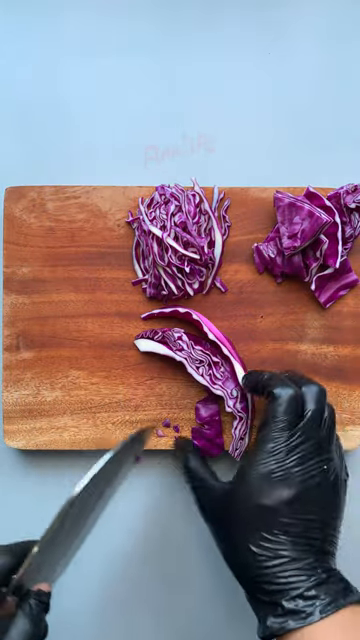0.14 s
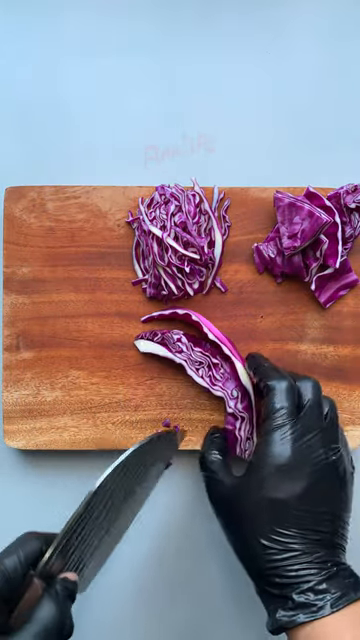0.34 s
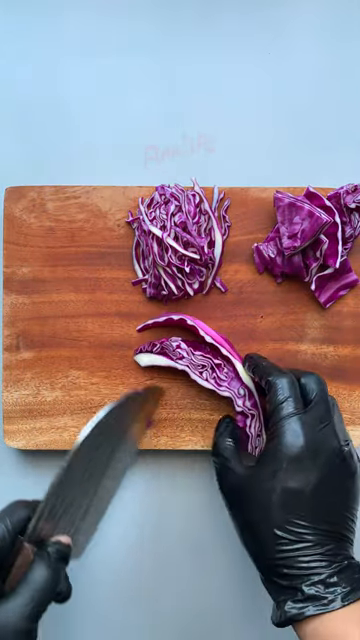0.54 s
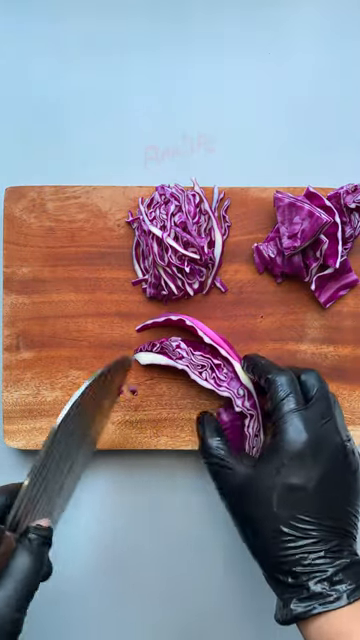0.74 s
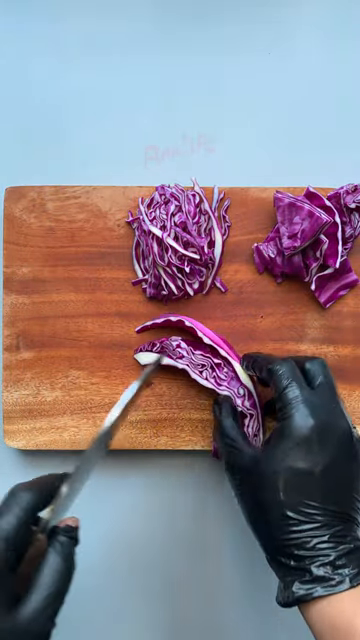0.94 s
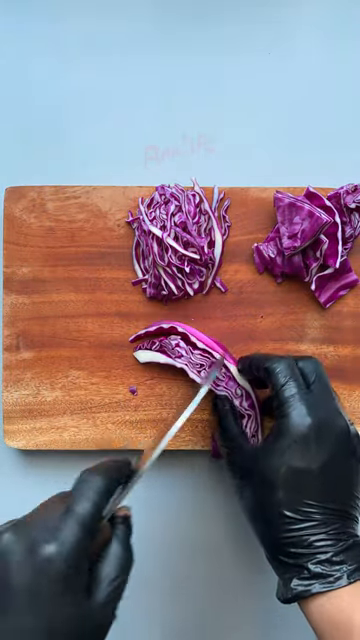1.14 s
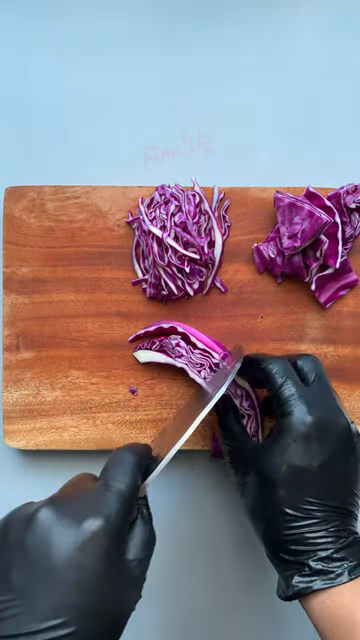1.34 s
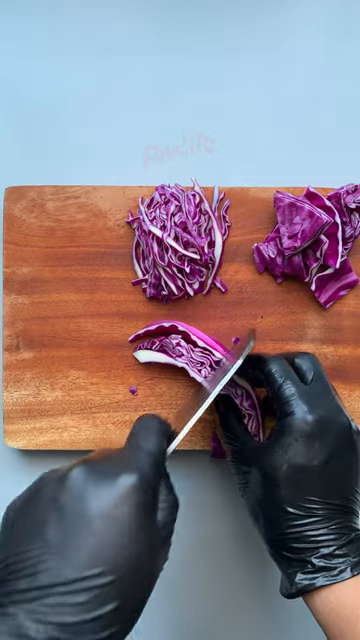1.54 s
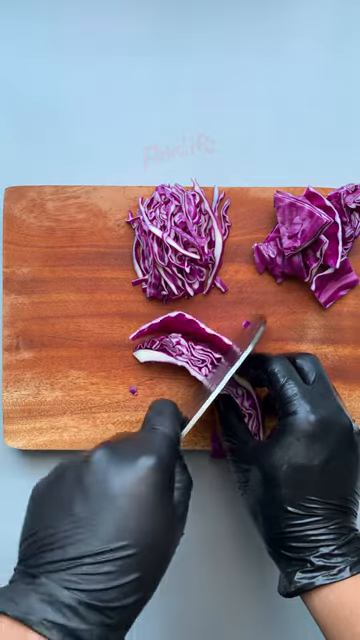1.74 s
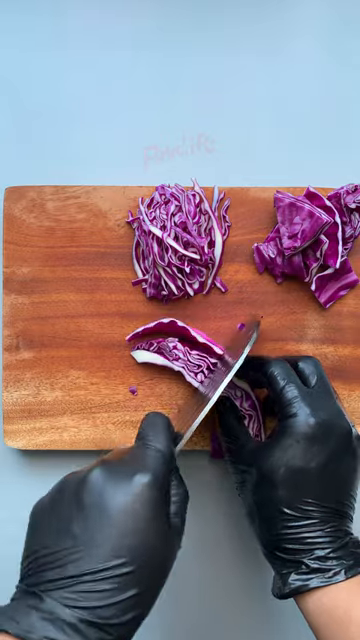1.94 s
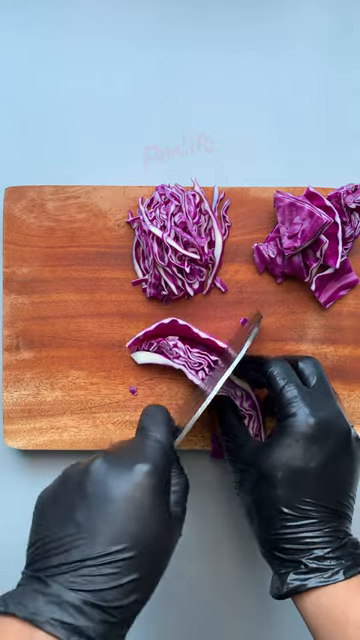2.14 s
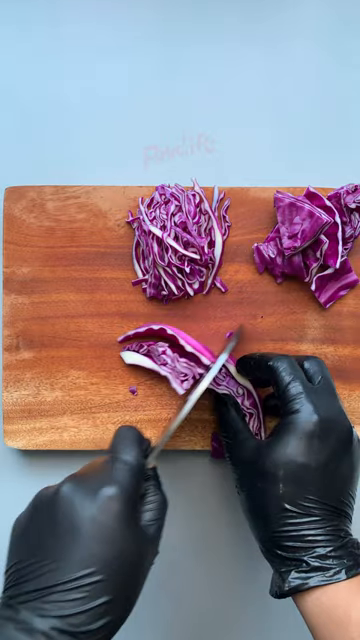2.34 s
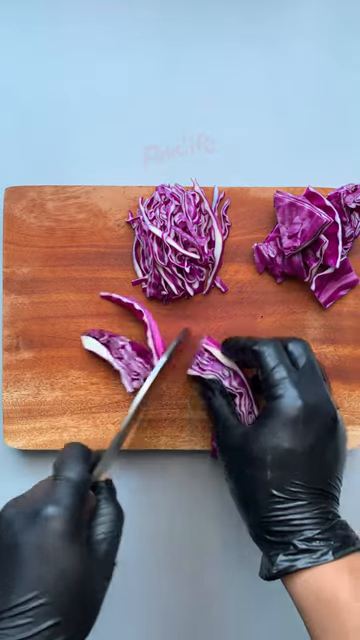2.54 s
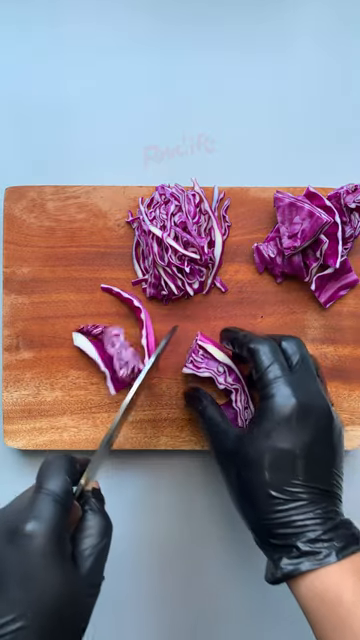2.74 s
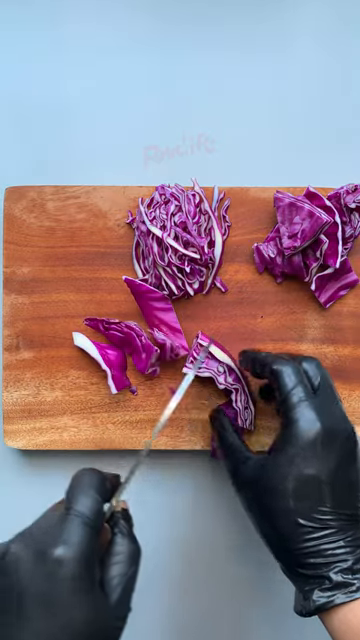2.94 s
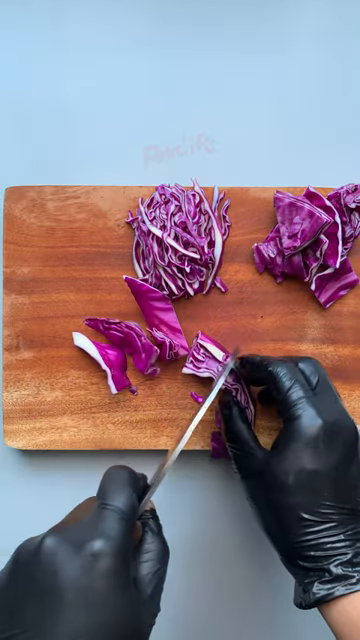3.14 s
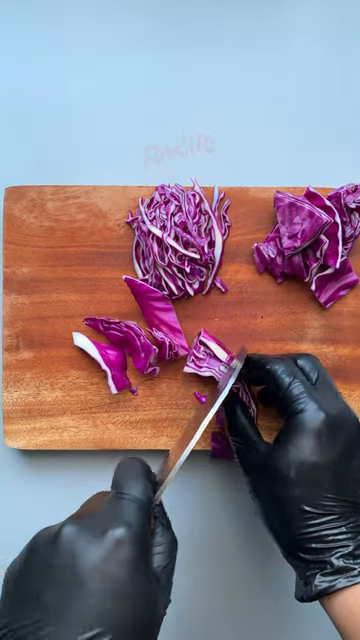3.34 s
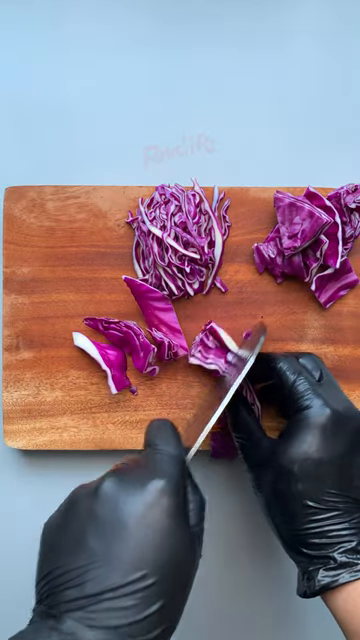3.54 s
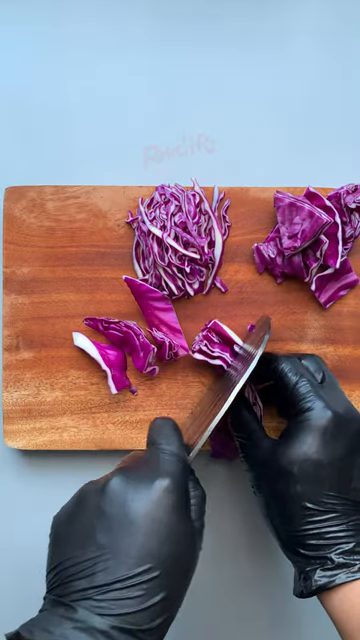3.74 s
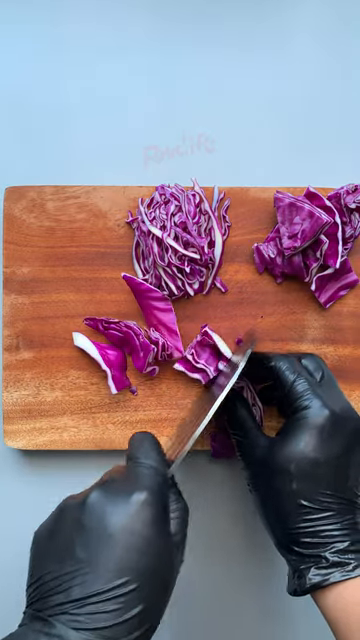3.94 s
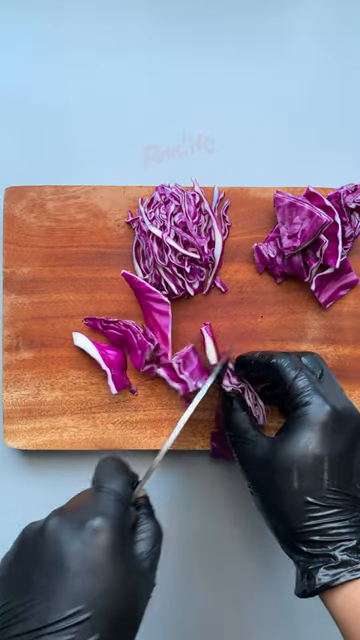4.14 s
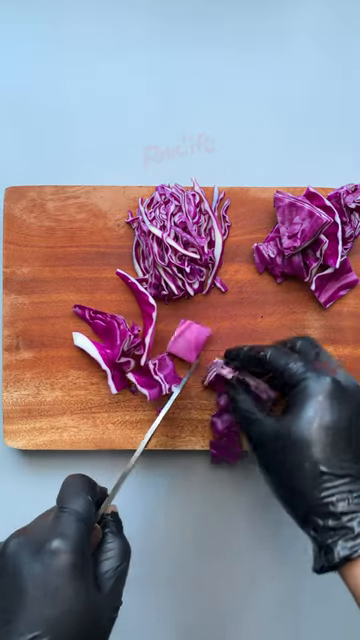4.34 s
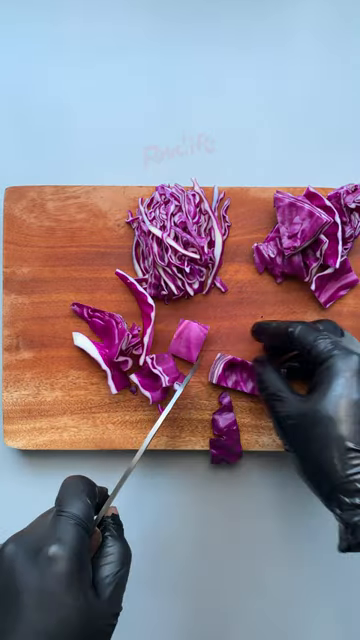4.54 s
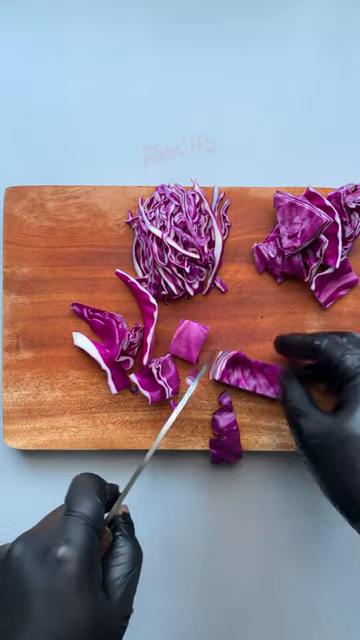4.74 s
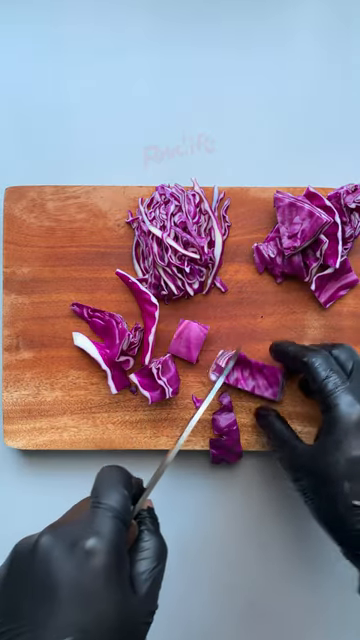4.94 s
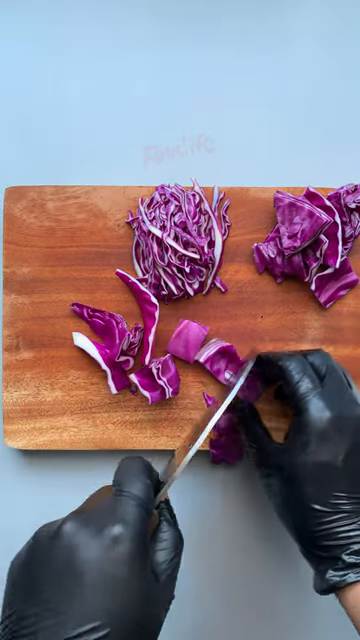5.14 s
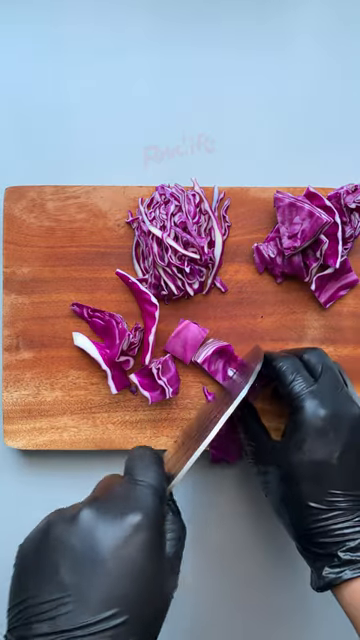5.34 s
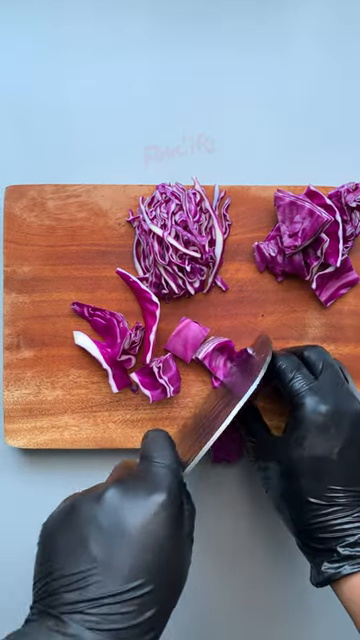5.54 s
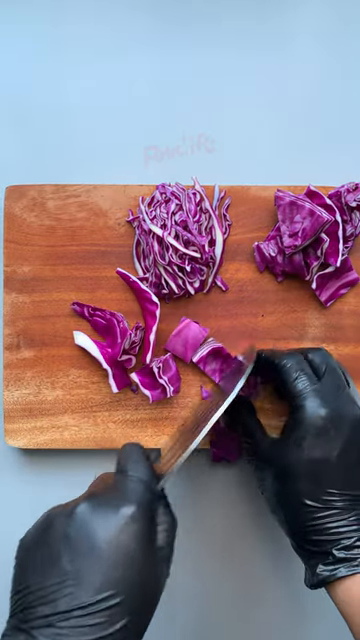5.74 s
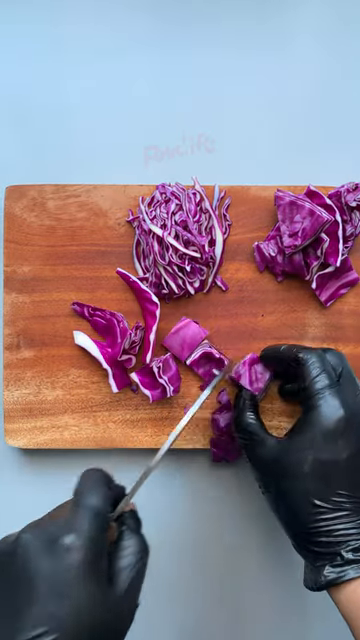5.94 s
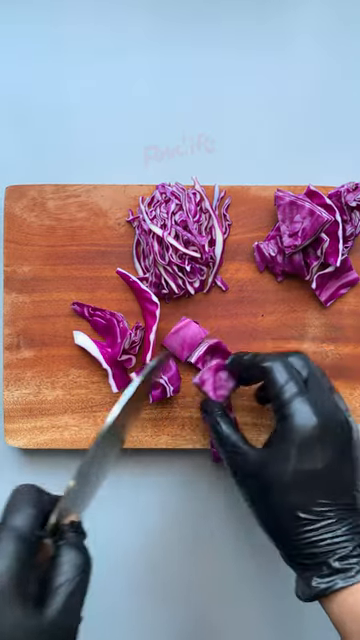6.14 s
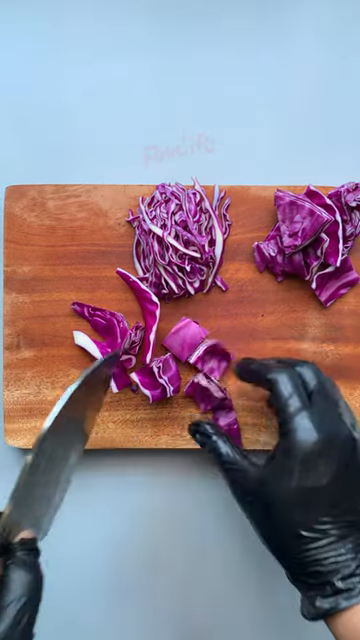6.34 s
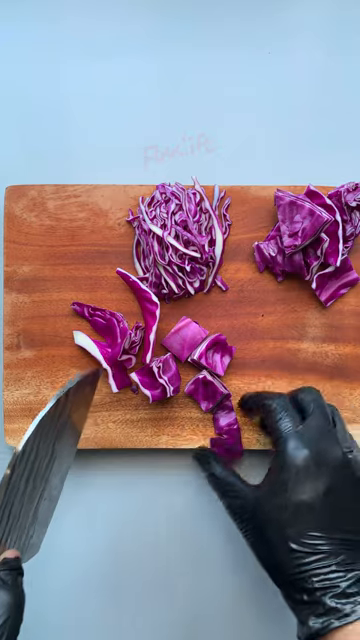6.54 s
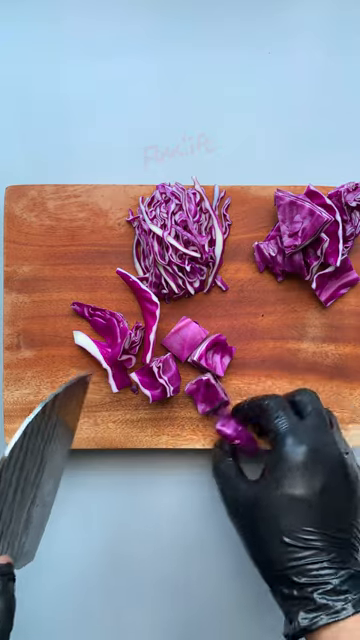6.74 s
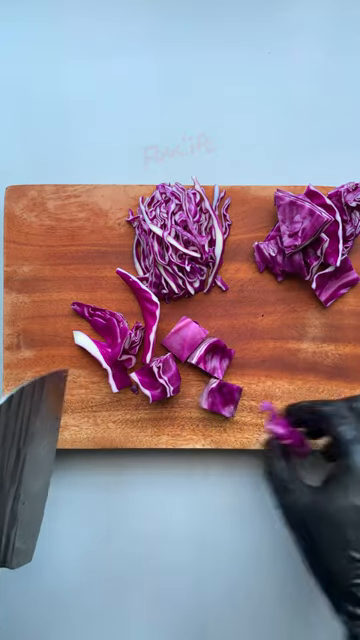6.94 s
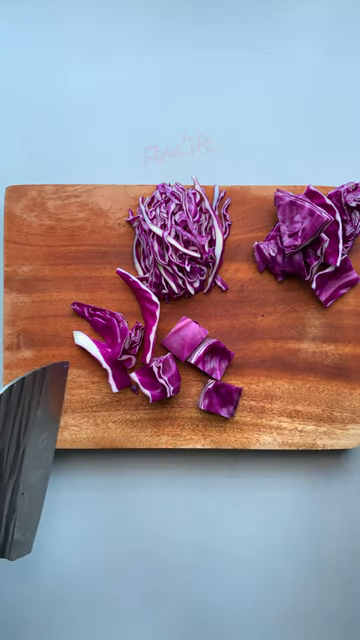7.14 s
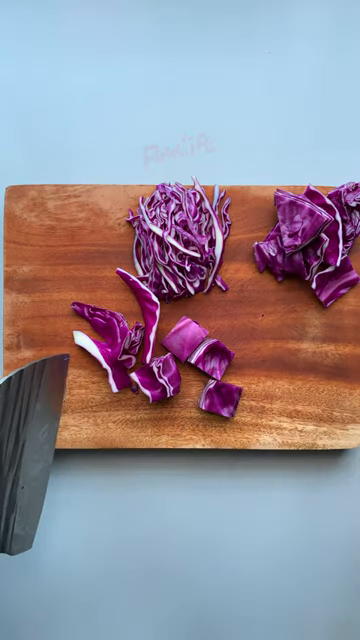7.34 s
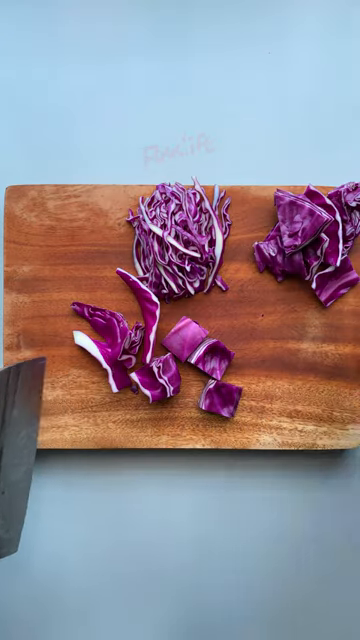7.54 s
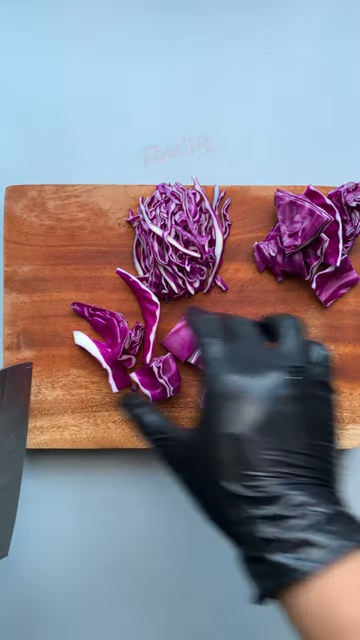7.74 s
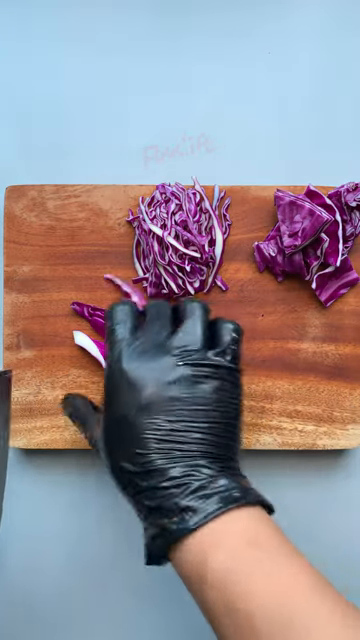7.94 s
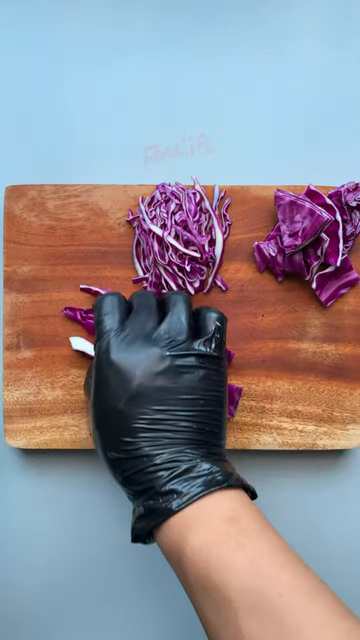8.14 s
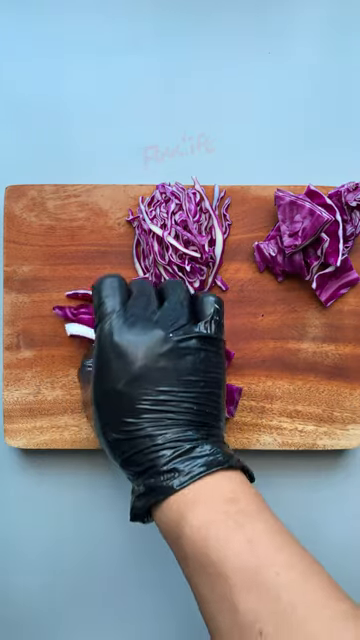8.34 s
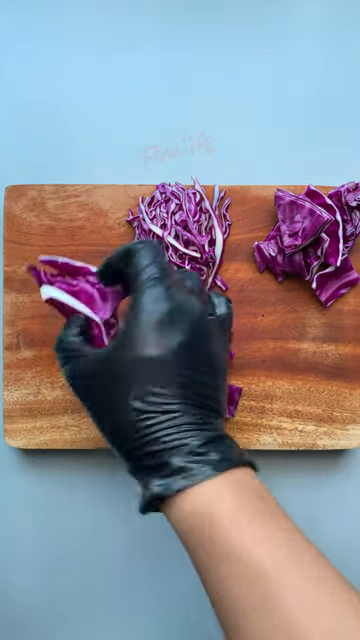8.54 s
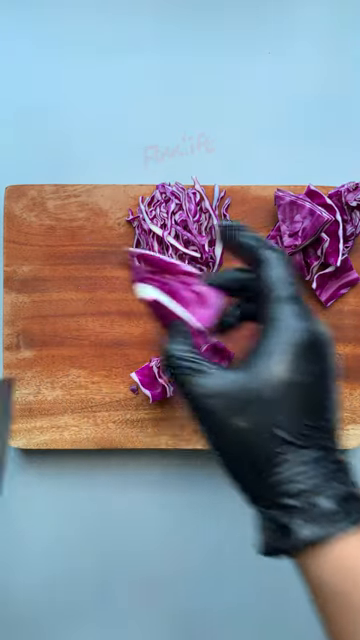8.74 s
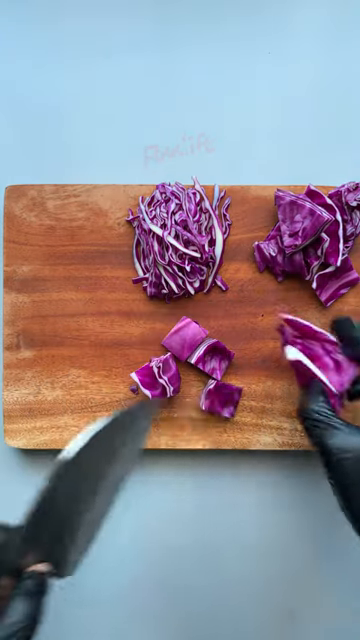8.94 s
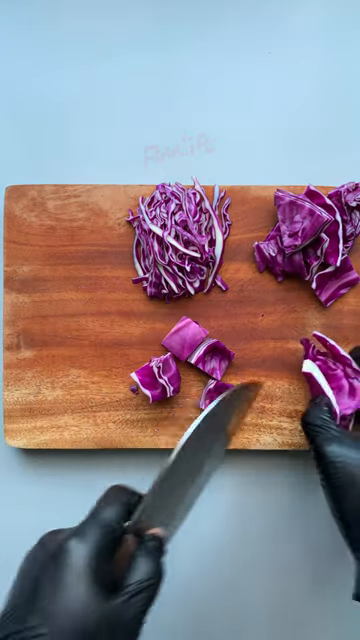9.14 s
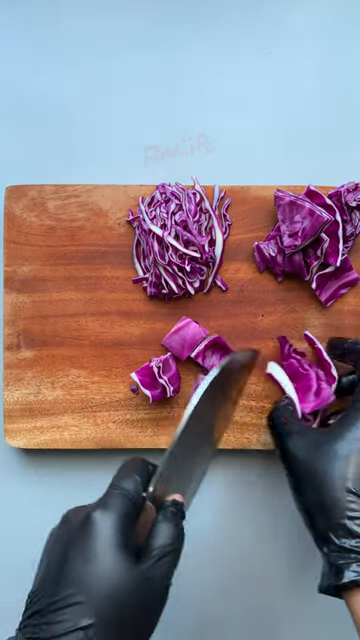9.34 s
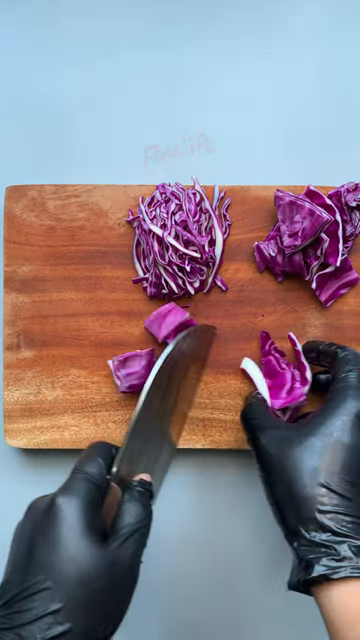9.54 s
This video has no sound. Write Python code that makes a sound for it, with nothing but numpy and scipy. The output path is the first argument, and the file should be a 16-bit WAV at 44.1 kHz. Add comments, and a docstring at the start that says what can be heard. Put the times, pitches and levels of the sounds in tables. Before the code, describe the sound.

A knife knocks on a wooden cutting board with a light steel ring, then pushes through crisp cabbage in three slow, crackling cuts. Each ends in a wooden knock, the second by far the loudest and the third followed by another. A gloved hand then softly rustles the pieces, and the blade taps and scrapes lightly. The sounds are close to the microphone in a quiet kitchen.

```python
"""A chef's knife cuts red cabbage on a wooden board, close to a phone in a quiet kitchen.
Leaf cells burst in a dense crackle, ribs snap and the waxy skin squeaks. The blade knocks on the
board and rings as it taps and drags over the wood; then a gloved hand gathers the pieces.
The phone's limiter turns down the hardest knock and lets the sound of the room swell back."""
import sys
import numpy as np
from scipy import signal
from scipy.fft import rfft, irfft, next_fast_len
from scipy.io import wavfile
from scipy.ndimage import uniform_filter1d, minimum_filter1d, map_coordinates

SR = 44100
rng = np.random.default_rng(int(sys.argv[2]) if len(sys.argv) > 2 else 0)


def waveform_to_disk(signal):
    """Save audio, clipped to [-1, 1], as 16-bit WAV at the path in sys.argv[1]."""
    frames = np.transpose(np.atleast_2d(signal))
    scaled = np.clip(frames, -1, 1) * 32767
    samples = np.round(scaled).astype(np.int16)
    wavfile.write(sys.argv[1], SR, samples)


N = 426888
TIME = np.arange(N) / SR
SIZE = next_fast_len(N + SR, real=True)
FREQ = np.maximum(np.arange(SIZE // 2 + 1) * SR / SIZE, 1)

# tone of the quiet room: (frequency [Hz], level [dB])
HUSH_TONE = [(15, -43.5), (25, -19.5), (92, 2.5), (166, -11.5), (200, -5.5), (223, -14.5), (451, -13),
             (575, -22.5), (624, -20), (911, -24.5), (4200, -33), (5400, -45), (8360, -50), (9840, -59.5),
             (12500, -54), (16000, -72.5)]
# slow rise and fall of its hiss: (time [s], gain [dB])
HISS_CHANGES = [(0, -0.5), (1.1, -7.5), (2.8, -0.5), (4.2, 3), (4.7, 2.5), (7.1, 3), (7.7, 2), (8.3, -3),
                (9.68, -6)]
# moves of the glove among the leaves: (time [s], level [dB], length [s])
GLOVE_MOVES = [(0.0, -62.5, 0.08), (0.294, -65, .2), (0.954, -76.5, 0.25), (2.8, -67, 0.19),
               (3.243, -70.5, 0.095), (4.309, -72.5, 0.39), (4.632, -72, .3), (4.899, -78, 0.28),
               (5.314, -76.5, .2), (5.961, -61.5, 0.14), (6.036, -63.5, 0.15), (6.123, -59.5, 0.093),
               (6.346, -72, .2), (7.389, -60.5, 0.27), (7.681, -52.5, 0.23), (7.77, -55, 0.093),
               (7.94, -57, 0.14), (8.23, -64, 0.17), (8.66, -55.5, 0.13), (8.759, -52, 0.094),
               (8.891, -61.5, 0.3), (9.388, -67.5, .3)]
# tone of the glove's crinkle: (frequency [Hz], level [dB])
GLOVE_TONE = [(1000, -26.5), (2500, -20.5), (4700, -8.5), (6400, -0.5), (8200, 1.5), (10000, -4),
              (12100, -5), (16000, -11)]
# notes at which fibres and folds snap: (pitch [Hz])
FIBRE_PITCHES = [1500, 2600, 4100, 6400, 8200, 11500, 13200]
# blows on the board: (time [s], level [dB], dull above [Hz], pitch favoured by the spot hit [Hz],
# thump of the table [dB], gain into the room [dB])
BOARD_KNOCKS = [(0.388, -17.5, 624, 740, -11, 3), (0.399, -21.5, 149, 126, 5, -6.5),
                (1.382, -38.5, 405, 192, 23.5, 8.5), (2.086, -23, 374, 273, -3, 4),
                (2.443, -38, 147, 120, 28, 4), (3.326, -27, 540, 377, 15.5, 3),
                (3.345, -33, 259.9, 190.3, 10, 0), (3.8003, -14, 1250, 704, -5.5, 0.5),
                (3.804, 6, 1560, 618, -6, 1.5), (4.152, -42, 168, 120, 37, 0),
                (4.178, -42, 1202, 862, -4, -2), (5.41, -30.5, 470, 392, 19, 6),
                (5.513, -6.5, 575, 518, 4.5, 0), (5.614, -26.5, 248, 197, -8, -3.5),
                (5.7942, -12, 1080, 1090, 2, -3), (9.073, -49, 400, 299, -4, 6.5),
                (9.485, -46, 1390, 1080, 33.5, 10.5)]
# notes at which the board rings: (pitch [Hz], width [Hz], level [dB])
BOARD_NOTES = [(131, 40, -10.5), (185, 59, -16.5), (256.3, 37, -3), (361.7, 70, -7), (467, 88, 2),
               (593, 60, -8), (675, 56, -4), (798, 21, -10), (828.4, 45, -6.5), (1085, 72, -1),
               (1196, 23, -14), (1347, 52, -8), (1410, 29, -4), (1513, 38, -10.5), (1629.5, 90, -19),
               (1870, 75, -4), (2200, 110, -16), (2750, 260, -12.5), (3600, 600, -9.5)]
# the edge meets bare wood, stuttering at the end: (time [s], level [dB], longest ring time [s])
BLADE_TAPS = [(0.388, -37, 0.73), (2.443, -35.5, 0.43), (2.525, -35, 0.45), (4.177, -50, .2),
              (9.486, -35, 0.048), (9.519, -35, 0.062), (9.542, -41, .05), (9.562, -44, .05),
              (9.582, -45, .05)]
# notes of the steel; a ring time (t60) is a fade of 60 dB: (pitch [Hz], ring time [s], level [dB])
BLADE_NOTES = [(1108, 0.13, 7.5), (1940, 0.77, 6), (2800, 0.063, 1), (3000, 0.16, 0.5), (3180, 0.18, -9),
               (3460, 0.096, -4), (5240, 0.28, -6.5), (5690, 0.12, -1.5), (6330, .2, -4.5),
               (6486, 0.13, -2), (6600, 0.25, -5.5), (6920, 0.16, 1), (8600, 0.1, 3.5),
               (10763, 0.069, -0.5), (12400, 0.1, -3), (13350, 0.13, -6.5)]
# drags over the wood: (time at full force [s], rise [s], hold [s], fall [s], level [dB],
# gain of the board's rumble [dB], gain of the steel's ring [dB])
BLADE_DRAGS = [(0.524, 0.15, 0.028, 0.1, -67, -21, 16), (2.398, 0.52, .06, 0.047, -54, -9.5, -1.5),
               (2.477, 0.065, 0.062, 0.11, -48, 2, -4.5), (4.022, 0.12, 0.15, .1, -60, 6.5, 0),
               (9.533, 0.12, 0.038, 0.18, -55.5, -3, -10)]
# tone of the edge catching on the grain: (frequency [Hz], level [dB])
GRIT_TONE = [(500, -12), (1100, -1), (1600, 0.5), (3400, 5), (5000, 3), (7000, 5.5), (9000, -8),
             (12000, -6.5), (16000, -8.5)]
# snaps of leaf ribs and ticks of the glove: (time [s], level [dB], pitch [Hz], ring time [s])
SINGLE_SNAPS = [(0.6546, -49.5, 8800, 0.049), (0.786, -51, 8650, 0.022), (1.58, -31, 11600, 0.014),
                (1.6505, -32, 7030, 0.012), (1.6861, -27, 12000, 0.012), (1.892, -36, 3900, 0.02),
                (1.8998, -34.5, 4850, 0.043), (2.6426, -46.5, 6100, 0.011), (2.737, -49, 5760, 0.043),
                (2.761, -44, 11900, 0.022), (2.8664, -57, 6700, 0.031), (2.9023, -50.5, 6850, 0.019),
                (3.3312, -51.5, 3730, 0.15), (3.468, -34.5, 11600, 0.079), (3.4915, -30, 8500, 0.023),
                (3.578, -33, 8300, 0.015), (3.607, -29.5, 12180, 0.039), (4.6252, -52, 6250, 0.036),
                (5.3937, -46, 8260, 0.017), (5.4915, -24.5, 6000, 0.064), (5.5355, -24.5, 7200, 0.023),
                (5.7764, -39, 11660, 0.051), (5.897, -42.5, 6540, 0.034), (6.026, -40.5, 3970, 0.025),
                (6.135, -47.5, 6947, 0.029), (6.6576, -61, 6450, 0.025), (7.2068, -48.5, 12180, 0.029),
                (7.355, -46, 8420, 0.042), (7.675, -41, 8280, 0.038), (7.7925, -42.5, 8000, 0.056),
                (8.0165, -50.5, 6480, 0.032), (8.514, -52, 12860, 0.03), (8.6316, -49.5, 8580, 0.032),
                (8.7148, -48, 6210, 0.025), (8.7458, -49.5, 6770, 0.035), (8.8328, -52, 8600, 0.029),
                (8.8624, -48.5, 8100, 0.025), (9.3121, -42.5, 6574, 0.032)]
# pushes through the leaves: (time at full force [s], rise [s], hold [s], fall [s], level [dB],
# gain of the treble [dB], gain of the crunch in the board [dB])
KNIFE_CUTS = [(1.306, .02, .01, 0.09, -70.5, 4, 8), (1.589, 0.17, 0.033, .05, -48, 4, -1.5),
              (1.642, 0.037, .055, 0.077, -40.5, -2, -2.5), (1.905, .012, .005, 0.11, -46, -20, 0.5),
              (2.064, .025, 0.027, 0.051, -36, -9, -7), (3.505, .075, .02, .06, -44.5, 3.5, 0),
              (3.578, 0.076, .062, .075, -43, 5.5, -3), (3.753, .012, .005, 0.043, -55, 3, -5.5),
              (3.801, .02, .01, .018, -39.5, 1.5, 1.5), (5.454, .05, 0.023, .04, -51.5, 5.5, 5.5),
              (5.495, 0.026, 0.022, 0.052, -42, 4, 3.5), (5.659, .1, .1, .05, -75.5, 17.5, 0),
              (5.791, .02, .008, 0.025, -64, 18.5, 19)]
# tone of breaking leaves, heard through the air: (frequency [Hz], level [dB])
CRACKLE_TONE = [(500, -30), (1300, -6), (2200, 1.5), (4100, 4.5), (5100, 6), (6300, 4.5), (7400, 2.5),
                (8300, 7), (10000, 4), (12300, 3), (14000, 2.5), (16000, -1)]
# tone of breaking leaves, carried by the board: (frequency [Hz], level [dB])
CRUNCH_TONE = [(80, -33.5), (200, -8), (330, 7.5), (450, -2), (560, -1), (760, -12.5), (1120, -7),
               (1500, -17.5), (3000, -43.5)]
# brief pitched rubs: squeaks on leaf skin and, last, the blade's ring as it stutters on the board:
# (middle time [s], half length [s], pitch [Hz], half width [Hz], level [dB])
PITCHED_RUBS = [(1.927, 0.024, 2200, 420, -43), (3.29, 0.14, 1512, 229, -66.5),
                (5.38, 0.13, 1450, 260, -64.5), (7.413, 0.017, 1590, 498, -66),
                (9.527, 0.0184, 2710, 128, -49)]
# how long the kitchen echoes: (frequency [Hz], ring time [s])
ROOM_RING_TIMES = [(100, .65), (300, .52), (1000, .55), (3000, .5), (8000, .3), (15000, .2)]
# tone of that echo: (frequency [Hz], level [dB])
ROOM_TONE = [(60, -13), (120, -0.5), (200, -3), (330, -14.5), (560, -12.5), (1000, -10), (2000, -7.5),
             (3500, -7), (6000, -11), (14000, -21)]
# how far the left microphone is ahead of the right: (frequency [Hz], phase [radians])
MIC_PHASE = [(100, 0), (400, -.3), (1200, -.1), (2200, .6), (3800, .9), (4500, 1.6), (5200, 3.8),
             (6600, 6.1), (7300, 6.3), (9850, 9.42), (11900, 12.4), (12900, 12.9), (15050, 15.7)]
# how much louder the left microphone is: (frequency [Hz], left minus right [dB])
MIC_BALANCE = [(100, -.7), (380, -2.3), (700, -2), (1290, -1), (2380, -3), (3800, 0), (4900, -3.5),
               (5900, 2), (6700, 0)]


def undb(db):
    """Turn decibels into a gain."""
    return 10 ** (np.asarray(db) / 20)


def unit(x):
    """Scale a sound to an average (rms) level of 1."""
    return x / np.sqrt(np.mean(x ** 2))


def on_log(points, hz=FREQ):
    """Join points by straight lines on a scale of octaves."""
    f, value = np.transpose(points)
    return np.interp(np.log(hz), np.log(f), value)


def shape(x, response):
    """Filter a sound with one gain for each frequency."""
    return irfft(rfft(x, SIZE) * response, SIZE)[..., :N]


def resonance(hz, width_hz, f=FREQ):
    """Filter for one ringing note, with a gain of 1 at its centre."""
    return 1 / (1 + 1j * (f / hz - hz / f) * hz / width_hz)


def add(track, s, sound):
    """Mix a sound in at s seconds."""
    start = max(int(s * SR), 0)
    track[start:start + len(sound)] += sound[:N - start]


def swell(s, rise_s, hold_s, fall_s, depth_db=22.5):
    """Gain of one push: up by depth_db over the rise, full at s, held, then down as much over the fall."""
    gain = np.zeros(N)
    span = slice(max(int((s - 3 * rise_s) * SR), 0), int((s + hold_s + 3 * fall_s) * SR))
    away = np.maximum((s - TIME[span]) / rise_s, (TIME[span] - s - hold_s) / fall_s)
    gain[span] = undb(-depth_db * np.maximum(away, 0))
    return gain


def click_sizes(count, spread_db):
    """Random clicks, up or down: many small, a few large."""
    return undb(spread_db * np.minimum(rng.exponential(size=count), 4)) * rng.choice([-1, 1], count)


def bursts(per_s, spread_db, clump_db, clump_hz):
    """Tiny breaks of unequal size that come in clumps."""
    sizes = click_sizes(N, spread_db)
    wander = np.clip(rng.standard_normal(N), -2, 2)
    clumps = undb(clump_db * np.interp(TIME * clump_hz, np.arange(N), wander))
    return unit((rng.random(N) < per_s / SR) * sizes * clumps)


def diffuse(alike_hz):
    """Stereo noise from all sides: left and right are alike in the bass, unrelated higher up."""
    mid, side = rng.standard_normal((2, N))
    likeness = 1 / (1 + (FREQ / alike_hz) ** 2)
    mid = shape(mid, np.sqrt((1 + likeness) / 2))
    side = shape(side, np.sqrt((1 - likeness) / 2))
    return np.array([mid + side, mid - side])


def hush(level_db=-56.5, hiss_hz=1200, right_db=0.5):
    """The room rumbles softly under a faint, slowly changing hiss."""
    air = undb(level_db) * unit(shape(diffuse(alike_hz=430), undb(on_log(HUSH_TONE))))
    hiss = shape(air, 1 / (1 + (hiss_hz / FREQ) ** 2))
    hiss_gain = undb(np.interp(TIME, *np.transpose(HISS_CHANGES)))
    return (air + hiss * (hiss_gain - 1)) * undb([[0], [right_db]])


def fibres(tone, per_s, spread_db, width_hz=1500):
    """Fibres and folds give little snaps, per_s a second at each of their pitches."""
    count = int(per_s * N / SR)
    spectrum = 0
    for hz in FIBRE_PITCHES:
        clicks = np.zeros(N)
        clicks[rng.integers(0, N, count)] = click_sizes(count, spread_db)
        spectrum = spectrum + rfft(clicks, SIZE) * resonance(hz, width_hz)
    return unit(irfft(spectrum * undb(on_log(tone)), SIZE)[:N])


def rustling(gain_db=-2, settle_db=-13, rise_share=0.45):
    """The glove and loose leaves crinkle with every move and after every single snap."""
    clicks = bursts(per_s=1000, spread_db=3.2, clump_db=3, clump_hz=70)
    crinkles = unit(shape(clicks, undb(on_log(GLOVE_TONE))))
    crinkles = unit(crinkles + fibres(GLOVE_TONE, per_s=70, spread_db=4))
    moves = sum(undb(db) * swell(s, rise_share * length, 0, (1 - rise_share) * length)
                for s, db, length in GLOVE_MOVES)
    settling = sum(undb(db + settle_db) * swell(s, rise_s=.01, hold_s=0, fall_s=.015)
                   for s, db, _, _ in SINGLE_SNAPS)
    return undb(gain_db) * (moves + settling) * crinkles


def knocks(travel=.105, thump_hz=71.4, thump_width_hz=85, spot_db=5, spot_octaves=0.15):
    """Blows ring the board, duller when leaves cushion them; gives the near sound and the room's share."""
    near, far = np.zeros(N), np.zeros(N)
    f = np.maximum(np.arange(SR // 2 + 1), 1)
    board = sum(undb(db) * resonance(hz, width, f) for hz, width, db in BOARD_NOTES)
    # waves bend the wood and take travel / sqrt(f) seconds, so low notes arrive late
    board *= np.exp(-4j * np.pi * travel * np.sqrt(f))
    board *= f ** 2 / (f ** 2 + 45 ** 2)  # too small to give off deep bass
    for s, db, contact_hz, spot_hz, thump_db, room_db in BOARD_KNOCKS:
        contact = 1 / np.sqrt(1 + (f / contact_hz) ** 7)
        spot = undb(spot_db * np.exp(-(np.log2(f / spot_hz) / spot_octaves) ** 2))
        table = undb(thump_db * np.abs(resonance(thump_hz, thump_width_hz, f)))
        blow = np.roll(irfft(board * contact * spot * table), SR // 100)[:SR // 2]  # 10 ms lead-in
        blow *= undb(db) / np.abs(blow).max()
        add(near, s - .01, blow)
        add(far, s - .01, blow * undb(room_db))
    return near, far


def blade_ring(longest_t60, overtones=50, overtone_db=-10, overtone_t60=0.09):
    """Struck steel rings with clear notes over many short, weak ones; contact cuts long rings short."""
    t = TIME[:SR // 2]
    crowd = [(hz, overtone_t60, overtone_db) for hz in rng.uniform(1900, 12000, overtones)]
    ring = np.zeros(len(t))
    for hz, t60, db in list(BLADE_NOTES) + crowd:
        t60 = min(t60, longest_t60)
        age = t[t < t60]
        add(ring, 0, np.sin(2 * np.pi * hz * age) * undb(db - 60 * age / t60))
    return ring


def taps(soft_hz=2200):
    """The edge touches down and the blade rings; the wood softens its highest notes."""
    out = np.zeros(N)
    softening = 1 / (1 + 1j * np.arange(SR // 2 + 1) / soft_hz)
    for s, db, t60 in BLADE_TAPS:
        ring = irfft(rfft(blade_ring(t60), SR) * softening)
        add(out, s, undb(db) * ring / np.abs(ring).max())
    return out


def waver(x, depth, per_s):
    """Let the pitch of a ringing sound wander a little."""
    drift = np.interp(TIME * per_s, np.arange(N), rng.standard_normal(N))
    return map_coordinates(x, [np.cumsum(1 + depth * drift)], order=3, mode="mirror")


def dragging(steel_db=-3, grit_db=-3, wood_db=-2, bright_hz=3400):
    """The edge catches on the grain of the wood, which rings the blade and rumbles in the board."""
    catches = bursts(per_s=3000, spread_db=2.5, clump_db=2.5, clump_hz=110)
    grit = unit(shape(catches, undb(on_log(GRIT_TONE))))
    wood_notes = resonance(655, 167) ** 2 + .5 * resonance(1106, 270) ** 2
    wood_notes += .57 * resonance(320, 153) ** 2
    wood = unit(shape(catches, wood_notes))
    pressed_blade = rfft(blade_ring(longest_t60=.2), SIZE)
    # such tiny catches favour the blade's higher notes
    steel = unit(shape(catches, pressed_blade / (1 + (bright_hz / FREQ) ** 2)))
    steel = waver(steel, depth=.003, per_s=30)  # the notes shift as the contact moves along the edge
    out = np.zeros(N)
    for s, rise_s, hold_s, fall_s, db, rumble_db, ring_db in BLADE_DRAGS:
        scrape = grit * undb(grit_db) + steel * undb(ring_db + steel_db)
        scrape += wood * undb(rumble_db + wood_db)
        out += undb(db) * swell(s, rise_s, hold_s, fall_s) * scrape
    return out


def snaps(gain_db=3, width_hz=3200, crack_db=4, crack_s=.0012):
    """A rib or a fold gives way: a sharp crack, then a short noise with a pitch of its own."""
    out, t = np.zeros(N), TIME[:SR // 20]
    f = np.linspace(1, SR / 2, len(t) // 2 + 1)
    for s, db, hz, t60 in SINGLE_SNAPS:
        noise = rfft(rng.standard_normal(len(t)))
        tone = resonance(hz, width_hz, f) * undb(on_log(CRACKLE_TONE, f))
        fade = undb(crack_db * np.exp(-t / crack_s) - 60 * t / t60)
        snap = irfft(noise * tone, len(t)) * fade
        add(out, s, undb(db + gain_db) * snap / np.abs(snap).max())
    return out


def cutting(treble_hz=5000):
    """Cells burst and fibres snap under the edge: bright crackle in the air, dull crunch in the board."""
    cells = bursts(per_s=2000, spread_db=1, clump_db=2, clump_hz=170)
    crackle = unit(shape(cells, undb(on_log(CRACKLE_TONE))))
    crackle = unit(crackle + .7 * fibres(CRACKLE_TONE, per_s=140, spread_db=3))
    crunch = unit(shape(cells, undb(on_log(CRUNCH_TONE))))
    treble = shape(crackle, 1 / (1 + (treble_hz / FREQ) ** 4))
    out = np.zeros(N)
    for s, rise_s, hold_s, fall_s, db, treble_db, crunch_db in KNIFE_CUTS:
        bright = crackle + (undb(treble_db) - 1) * treble
        out += undb(db) * swell(s, rise_s, hold_s, fall_s) * (bright + undb(crunch_db) * crunch)
    return out


def rubs():
    """Quick catches sound one brief pitch: a squeak on leaf skin, or the blade ringing as it stutters."""
    catches = bursts(per_s=1500, spread_db=1.5, clump_db=2, clump_hz=120)
    out, f = np.zeros(N), np.linspace(1, SR / 2, SR + 1)
    for s, half_s, hz, half_width_hz, db in PITCHED_RUBS:
        span = slice(int((s - 3 * half_s) * SR), int((s + 3 * half_s) * SR))
        tone = resonance(hz, 2 * half_width_hz, f) ** 2
        rub = irfft(rfft(catches[span], 2 * SR) * tone)[:len(catches[span])]
        fade = np.exp(-((TIME[span] - s) / half_s) ** 2)
        out[span] += undb(db) * fade * unit(rub)
    return out


def microphones(x):
    """Near sound reaches the two microphones at slightly different times and levels."""
    half = undb(on_log(MIC_BALANCE) / 2) * np.exp(.5j * on_log(MIC_PHASE))
    return shape(x, np.array([half, 1 / half]))


def kitchen(x, echo_s=0.016, echo_db=-13, echo_hz=700, build_s=0.014):
    """The room answers with one dull echo, then a wash of echoes whose treble dies first."""
    t = TIME[:2 * SR // 3]
    noise = rfft(diffuse(alike_hz=505.7)[:, :len(t)])
    f = np.linspace(1, SR / 2, noise.shape[1])
    band_hz, ring_times = np.transpose(ROOM_RING_TIMES)
    tail = 0
    for band, t60 in zip(np.eye(len(band_hz)), ring_times):
        weight = np.interp(np.log(f), np.log(band_hz), band) * undb(on_log(ROOM_TONE, f))
        fade = undb(-60 * t / t60) * (1 - np.exp(-(t / build_s) ** 2))
        tail = tail + irfft(noise * weight, len(t)) * fade / np.linalg.norm(fade)
    echo = undb(echo_db) * np.exp(-2j * np.pi * FREQ * echo_s) / (1 + (FREQ / echo_hz) ** 2)
    return shape(x, rfft(tail, SIZE) - echo)


def limiter(x, ceiling_db=-1, hold_s=0.1, release_db_per_s=85):
    """Turn the sound down just before a loud peak, wait, then bring it back at a steady rate."""
    ahead = SR // 400
    over_db = np.maximum(20 * np.log10(np.abs(x).max(axis=0) + 1e-9) - ceiling_db, 0)
    hold = 2 * int(hold_s * SR / 2) + 1
    held_db = -minimum_filter1d(-over_db, hold, origin=hold // 2)
    recovery_db = release_db_per_s * TIME
    cut_db = np.maximum.accumulate(held_db + recovery_db) - recovery_db
    return x * undb(-uniform_filter1d(np.roll(cut_db, -ahead), 2 * ahead))


def scene():
    """Board, leaves and steel, heard close up and through the room."""
    wood_near, wood_far = knocks()
    crisp = cutting() + dragging() + rustling() + snaps() + rubs()
    return microphones(wood_near + taps() + crisp) + kitchen(wood_far + crisp) + hush()


def record(dry):
    """The phone holds down peaks and cuts the highest treble."""
    treble_cut = signal.ellip(10, .2, 70, 15950, fs=SR, output="sos")
    return signal.sosfilt(treble_cut, limiter(dry))


dry = scene()
out = record(dry)
waveform_to_disk(out)
```